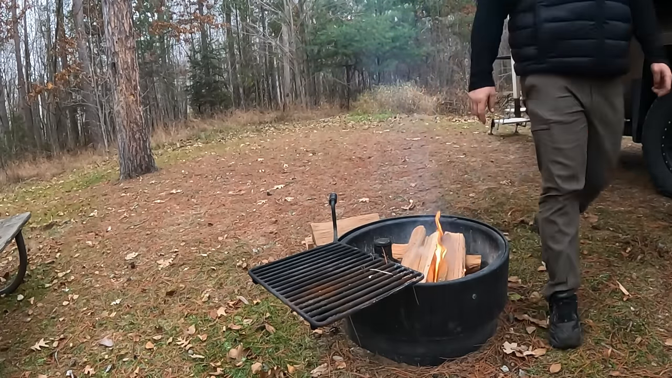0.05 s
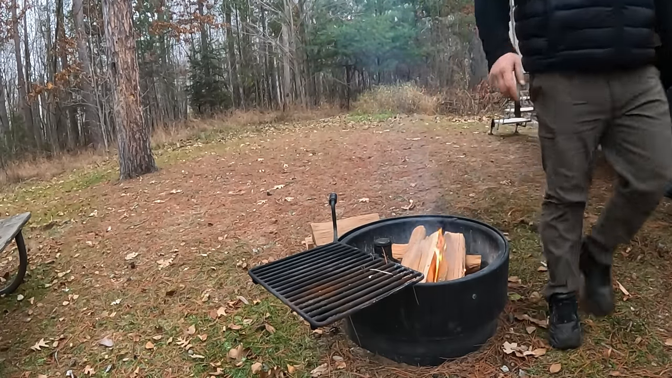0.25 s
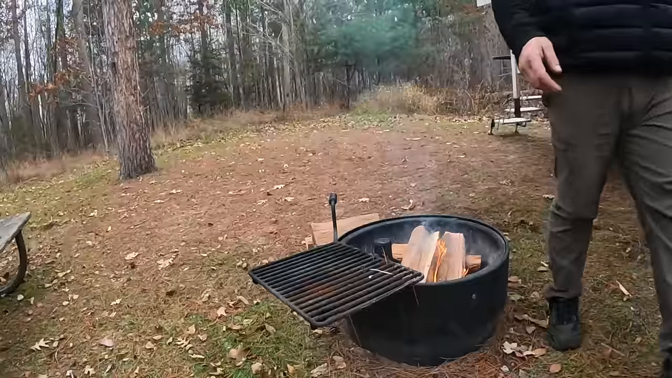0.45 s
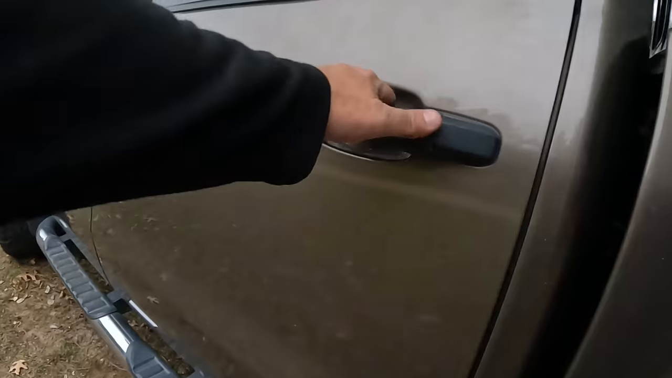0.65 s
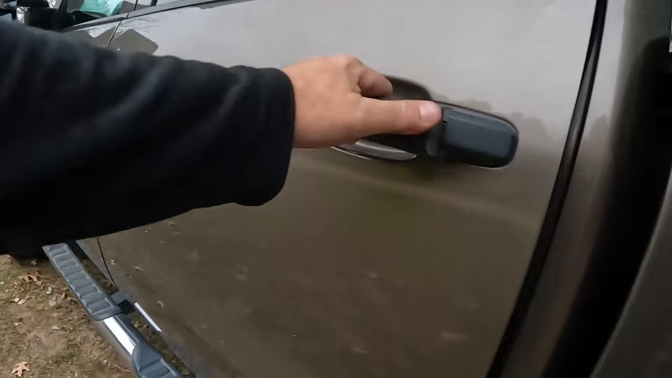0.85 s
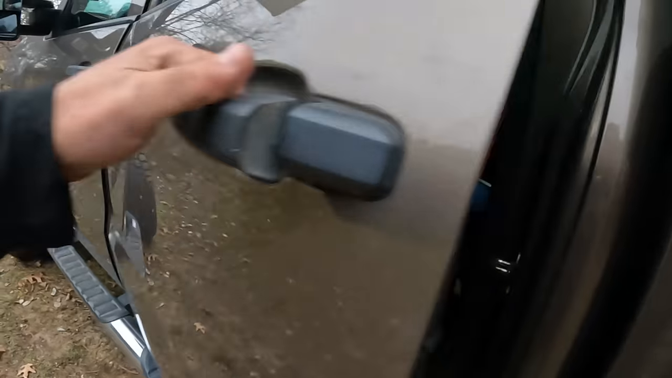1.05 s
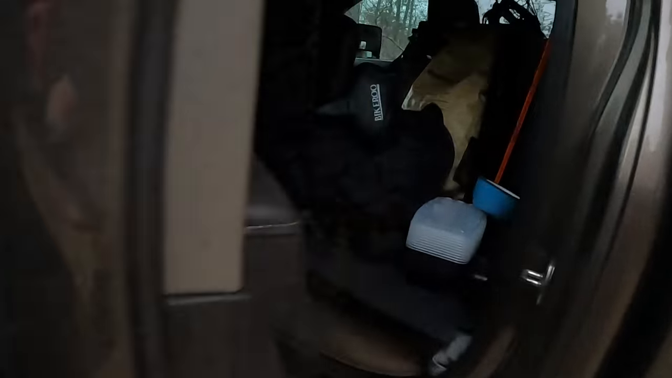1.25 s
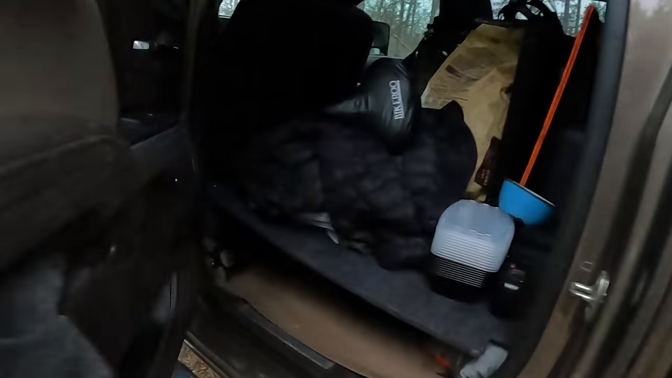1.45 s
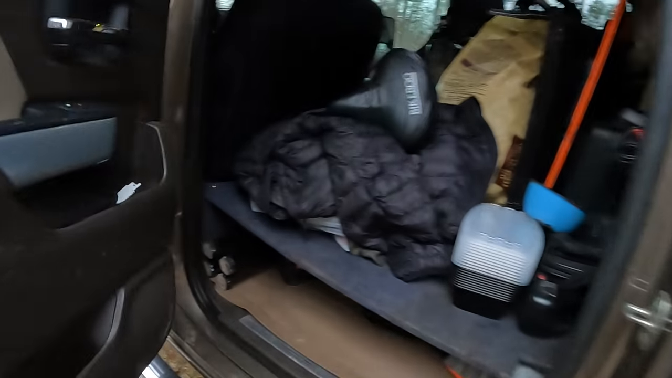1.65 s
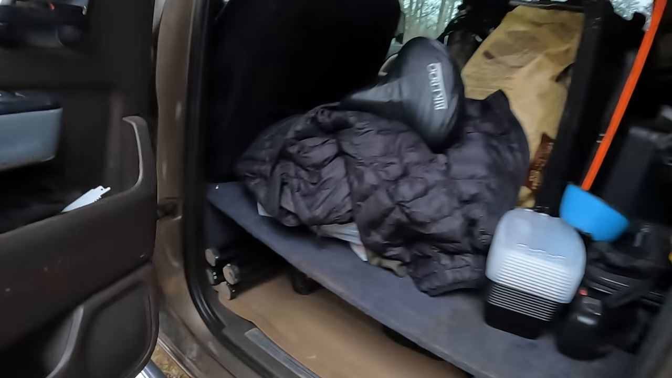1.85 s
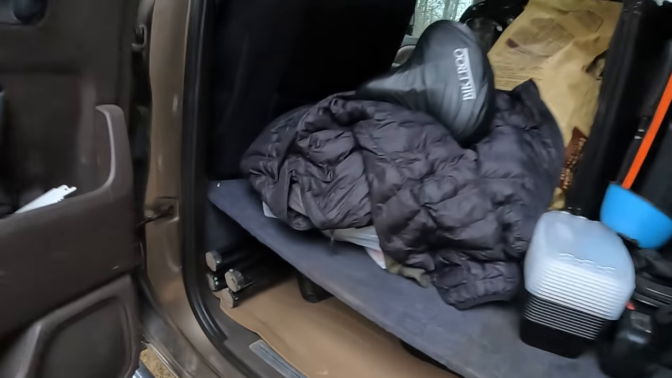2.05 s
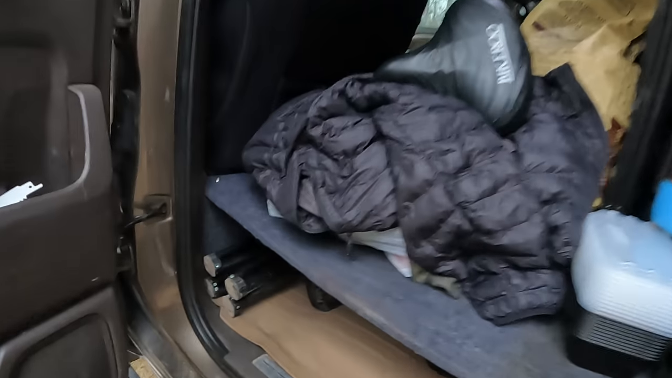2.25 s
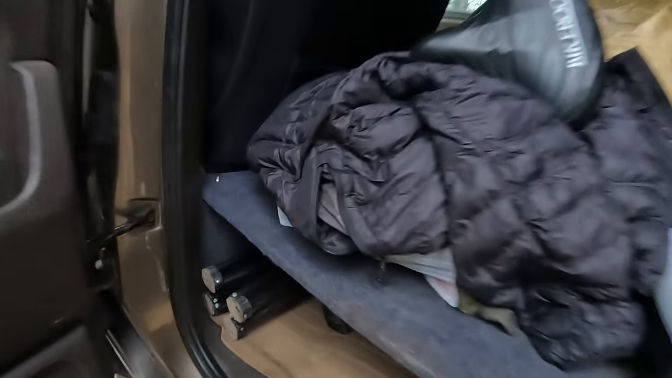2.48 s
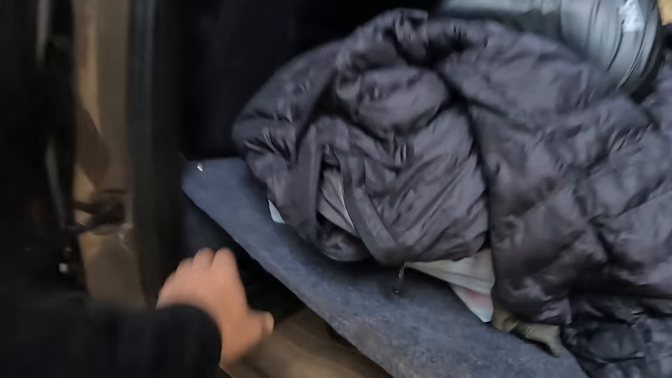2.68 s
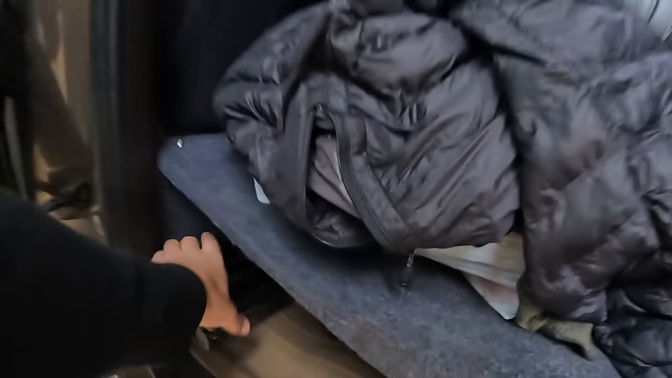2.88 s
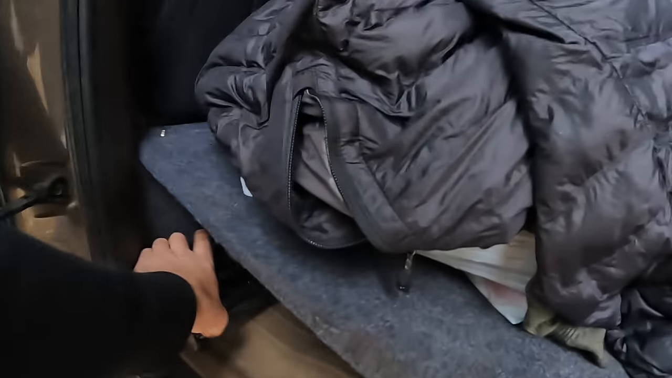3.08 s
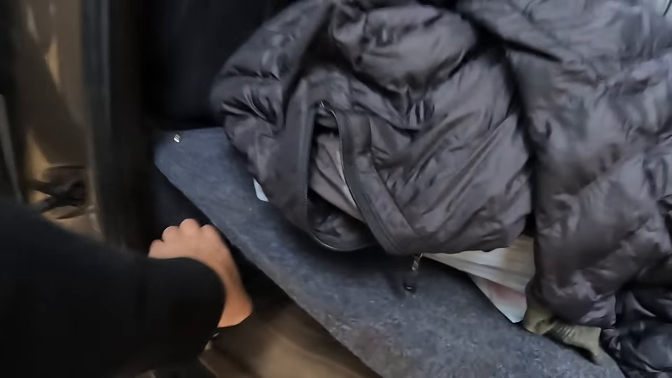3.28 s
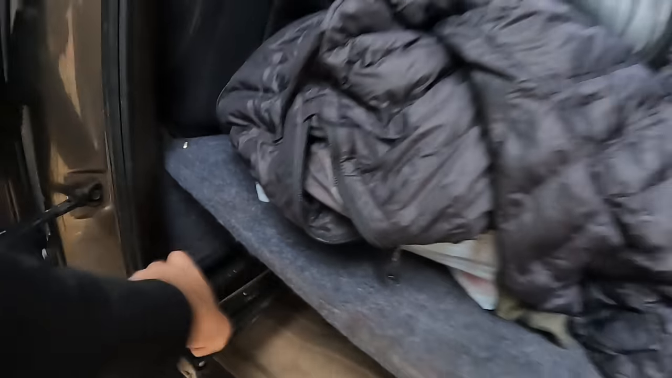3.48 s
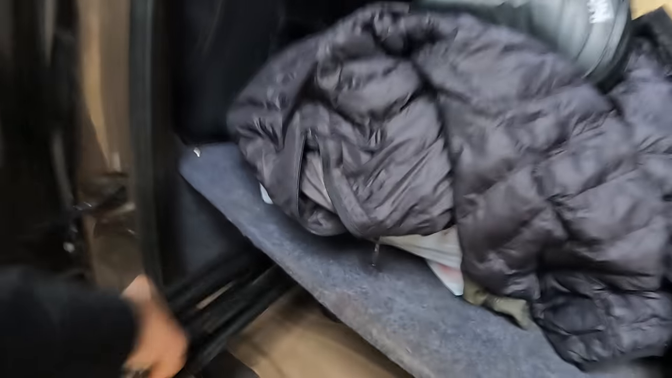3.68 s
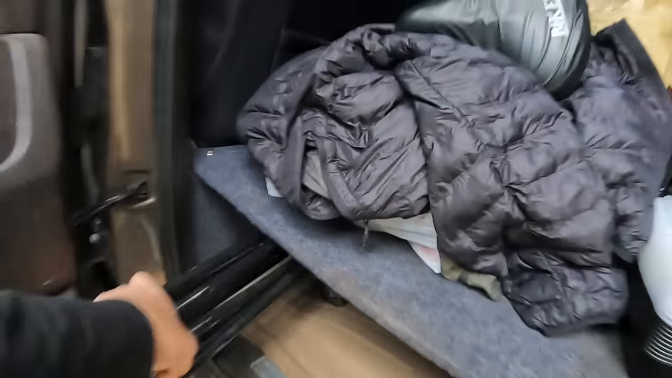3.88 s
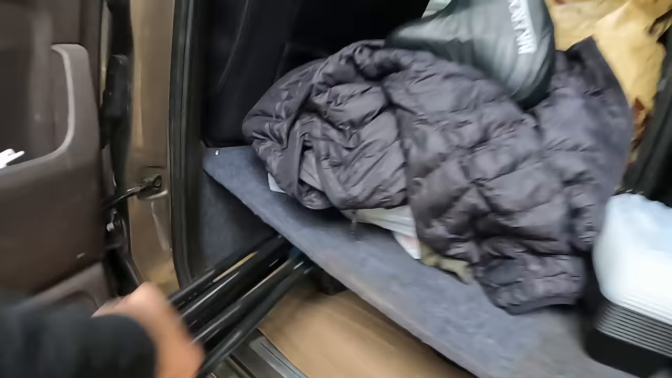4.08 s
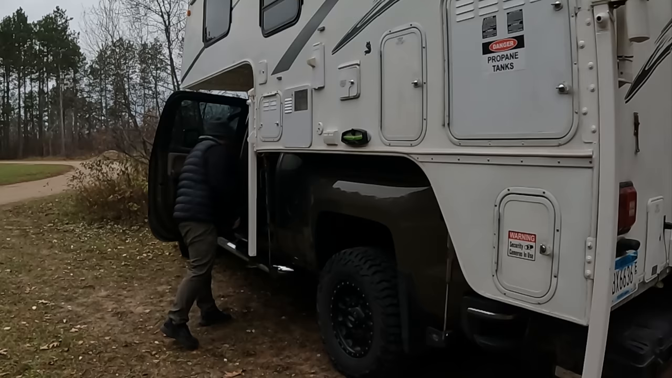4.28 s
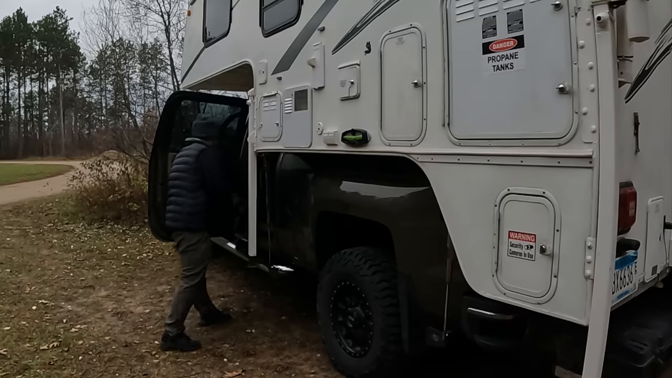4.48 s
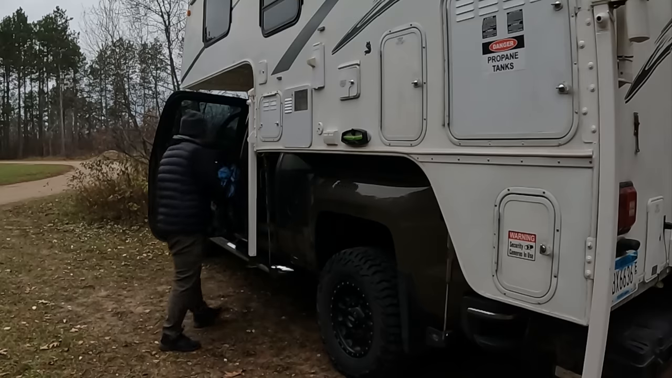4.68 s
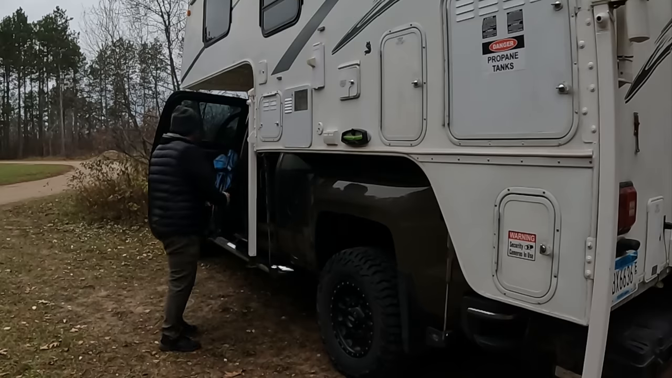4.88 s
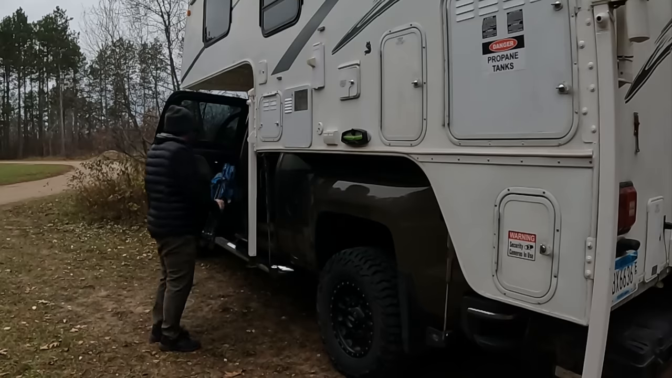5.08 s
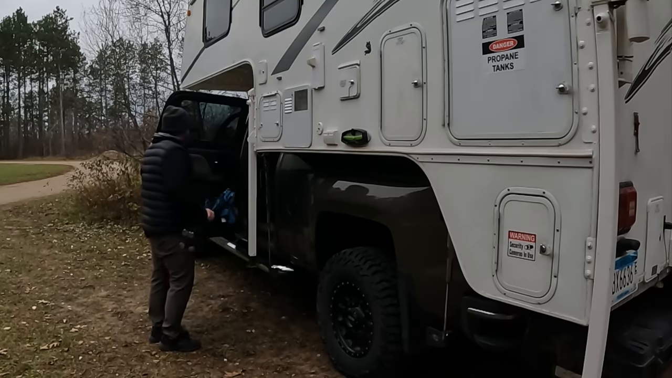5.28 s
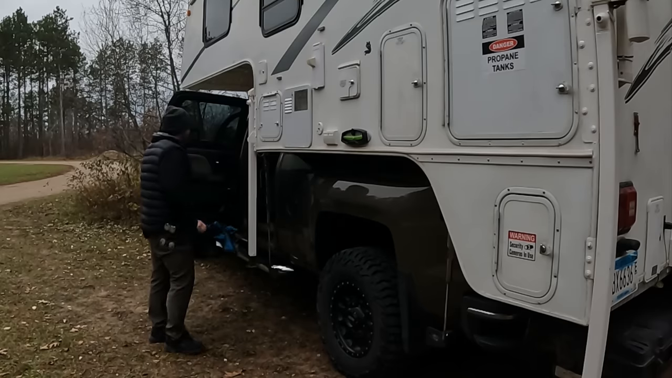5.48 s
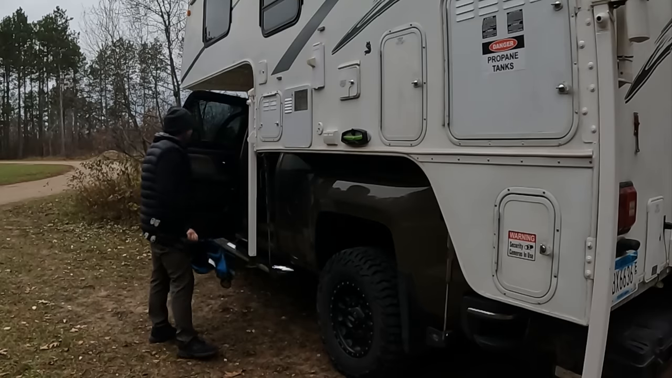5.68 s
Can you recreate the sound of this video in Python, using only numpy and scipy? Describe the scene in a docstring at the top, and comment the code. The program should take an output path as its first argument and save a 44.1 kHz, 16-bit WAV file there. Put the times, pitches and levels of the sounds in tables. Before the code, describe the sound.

In quiet woods, a body-worn microphone catches faint jacket rustle, then a loud dull door-latch clunk with quick rebounds. A sharper steel catch follows. Nylon swishes and small plastic ticks lead into tugs: low carpeted bumps, light metal tube clacks and rough fabric scraping, thinning to soft brushes and ticks.

```python
"""A pickup by quiet woods: its two side doors are unlatched and a folded camp chair is dragged out from under the seat.
Latch clunks, chair bumps and tube clacks are struck bodies: decaying sine modes plus band noise.
Floor rumble, cloth scrape and the wearer's nylon jacket are coloured noise under movement envelopes.
The camera is worn close to the jacket, which also ticks on its case; each microphone port hisses faintly."""
import sys
import numpy as np
from scipy import signal
from scipy.fft import rfft, irfft, next_fast_len
from scipy.io import wavfile
from scipy.ndimage import uniform_filter1d

SR = 44100
rng = np.random.default_rng(int(sys.argv[2]) if len(sys.argv) > 2 else 0)


def output_pcm(signal):
    """Save a mono or channel-first signal as 16-bit PCM at the path in sys.argv[1].

    Samples are clipped to [-1, 1] before scaling.
    """
    pcm = np.clip(np.atleast_2d(signal).T, -1, 1) * 32767
    wavfile.write(sys.argv[1], SR, np.round(pcm).astype(np.int16))


N = 253178
TIME = np.arange(N) / SR

# cloth scraping, of chair and jacket: hz, relative_db
SCRAPE_SPECTRUM = [(400, -18.5), (600, 4), (770, 7), (930, 2), (1130, 6.5), (1350, 5.5), (1560, 4),
                   (1850, -10), (2450, 1.5), (3500, -22.5), (6000, -23)]


def undb(db):
    """Decibels to gain."""
    return 10 ** (np.asarray(db) / 20)


def unit(x):
    """Scale to rms 1."""
    return x / np.sqrt(np.mean(x ** 2) + 1e-30)


def db_at(points, hz):
    """Read a spectrum on a log-frequency axis; it falls 20 dB per octave beyond its ends."""
    f, db = np.transpose(points)
    octave, known = np.log2(np.maximum(hz, 1)), np.log2(f)
    beyond = np.abs(octave - np.clip(octave, known[0], known[-1]))
    return np.interp(octave, known, db) - 20 * beyond


def colour(x, points):
    """Filter by a spectrum of (Hz, dB) points."""
    size = next_fast_len(len(x))
    hz = np.arange(size // 2 + 1) * SR / size
    return irfft(rfft(x, size) * undb(db_at(points, hz)), size)[:len(x)]


def coloured_noise(points):
    """Steady noise of rms 1 with the given spectrum."""
    return unit(colour(rng.standard_normal(N), points))


def walk(rate_hz):
    """Smooth random drift with an rms of 1."""
    k = max(int(SR / rate_hz), 1)
    steps = np.repeat(rng.standard_normal(N // k + 1), k)
    return unit(uniform_filter1d(steps, k)[:N])


def swells(events, attack, release):
    """Movements speed up, hold and slow down over shares of their length; one gain per dB column."""
    power = 0
    for start_s, length_s, *db in events:
        along = (TIME - start_s) / length_s
        ramp = np.clip(np.minimum(along / attack, (1 - along) / release), 0, 1)
        speed = np.sin(np.pi / 2 * ramp)
        power = power + (undb(db)[:, None] * speed) ** 2
    return np.sqrt(power)


def friction(points, grains_per_s, grain_db, spread_db, flutter_db, flutter_hz):
    """Countless tiny slips: a hiss with some larger grains, pressed unevenly, coloured by the surface."""
    present = rng.random(N) < grains_per_s / SR
    signs = rng.choice([-1, 1], N)
    sizes = undb(spread_db * np.minimum(rng.exponential(size=N), 4))
    grains = present * signs * sizes
    slips = rng.standard_normal(N) + undb(grain_db) * unit(grains)
    pressure = undb(flutter_db * walk(flutter_hz))
    return unit(colour(slips * pressure, points))


def blows(events, modes, rattle, rattle_db, rattle_t60_s, damping, rise_s, tail_db, tail_t60_s, shift):
    """Each blow rings a body's main modes and a dense rattle of lesser ones, with a weak longer tail."""
    t = np.arange(int(.6 * SR)) / SR  # every ring is cut at 0.6 s
    head = int(.015 * SR)  # a blow's level is the spread of these first samples
    hz, db, t60_s = np.transpose(modes)[:, :, None]
    pivot_octave = np.average(np.log2(hz), weights=undb(db))

    # rattle: noise in half-octave bands
    centres = 54 * 2 ** (np.arange(17) / 2)
    filters = [signal.butter(2, [f / 2 ** .25, f * 2 ** .25], "band", fs=SR, output="sos") for f in centres]
    noise = np.array([unit(signal.sosfilt(f, rng.standard_normal(2 * len(t)))) for f in filters])
    band_hz = centres[:, None]
    band_db = db_at(rattle, band_hz) + 10 * np.log10(band_hz)  # density to band level
    band_t60_s = rattle_t60_s * (band_hz / 2 ** pivot_octave) ** -damping  # treble dies first

    fade = -np.log(1000) * t
    contact = 1 - np.exp(-t / rise_s)
    sign = (-1) ** np.arange(len(hz))[:, None]
    out = np.zeros(N + len(t))
    for start_s, level_db, tilt_db, length, *main_hz in events:
        # every blow lands on a new spot, so the modes shift a little
        detune = 1 + shift * rng.standard_normal(hz.shape)
        spot_db = rng.standard_normal(hz.shape)
        start = rng.integers(len(t))
        if main_hz:  # a loose load is stiffer on some spots, which moves all its modes
            detune = detune * main_hz[0] / hz[np.argmax(db)]

        mode_gain = sign * undb(db + spot_db + tilt_db * np.log2(hz))
        ring = mode_gain * np.sin(2 * np.pi * hz * detune * t) * np.exp(fade / (t60_s * length))

        decay = np.exp(fade / (band_t60_s * length))
        tail = undb(tail_db) * np.exp(fade * rattle_t60_s / (band_t60_s * tail_t60_s))
        dense = noise[:, start:start + len(t)] * (decay + tail)
        dense = dense / dense[:, :2 * head].std(axis=1, keepdims=True)
        dense = dense * undb(band_db + tilt_db * np.log2(band_hz))

        ring, dense = ring.sum(0) * contact, dense.sum(0) * contact
        hit = ring / ring[:head].std() + undb(rattle_db) * dense / dense[:head].std()
        i = int(start_s * SR)
        out[i:i + len(t)] += hit / hit[:head].std() * undb(level_db)
    return out[:N]


def doors():
    """A dull clunk from the front latch, a sharp clack from the rear catch, and the slow sway of the panels."""
    # handle pulled, latch lets go: start_s, level_db, brightness_db_per_octave, ring_length_factor
    latch_blows = [(.755, -56.5, 30, 0.38), (.789, -42, 9.5, 2.4), (.8405, -17.5, -2, 0.6),
                   (.8465, -23, 3, .5), (.8485, -14, -0.5, 0.62), (.8495, -28, 6.5, 1.6),
                   (.8565, -30, 5, 0.74), (.8695, -48, -6, 0.33), (.9445, -41, 3.5, .8),
                   (.975, -48, 5, 1.2)]
    # front panel modes: hz, relative_db, t60_s (before ring_length_factor)
    front_modes = [(71.5, -15.5, 0.19), (128, -6, 0.092), (170.7, 0.5, 0.18), (284, -0.5, 0.171),
                   (422, -4.5, 0.078), (511, 3.5, 0.067), (734, -10.5, 0.039), (1068, -12, 0.074),
                   (1252, -11, 0.047), (1346, -16, 0.084), (1780, -21, 0.058), (2303, -26.5, 0.042),
                   (2750, -29.5, 0.042), (3170, -28, 0.037), (5050, -32.5, 0.013)]
    # front panel rattle: hz, relative_db
    front_rattle = [(24, -46), (40, -21.5), (290, 1.5), (359, -4), (425, 3), (566, -4.5), (718, -2),
                    (1130, -13), (1240, -17), (2000, -46), (2310, -30.5), (3640, -45.5), (12000, -86),
                    (15600, -103), (22000, -120)]
    # rear steel catch: start_s, level_db, brightness_db_per_octave, ring_length_factor
    catch_blows = [(1.482, -48, -14, 1), (1.496, -44, -1.5, 1.3), (1.559, -41, 0.5, 2.8),
                   (1.5815, -35.5, 7.5, 0.11), (1.5835, -20.5, 2.5, 0.56), (1.589, -28.5, 0, 0.62),
                   (1.595, -25, -3, 1.2), (1.630, -34.5, -20, 2.1), (1.672, -39, -8.5, 1.8)]
    # rear panel modes: hz, relative_db, t60_s (before ring_length_factor)
    rear_modes = [(196.6, -6, 0.13), (249, 1, 0.076), (314, -3, 0.07), (415, -4.5, 0.063), (557, 1, 0.034),
                  (744, 2, 0.075), (1116, -12, 0.13), (1300, -15, 0.093), (1740, -26, 0.1),
                  (2296, -11, 0.074), (3090, -3.5, 0.022), (4840, -20.5, 0.054), (5700, -26, 0.1),
                  (6460, -26, 0.089), (7200, -20, 0.042), (8760, -21, 0.04)]
    # rear panel rattle: hz, relative_db
    rear_rattle = [(59, -34), (100, -23), (201, 9), (589, 6), (742, 5), (1490, -12), (2320, -10),
                   (4280, -24), (5510, -30), (8950, -20.5), (12000, -56), (14200, -60), (15500, -87)]
    # door swings: start_s, length_s, level_db
    swings = [(.86, .2, -58), (1.44, 0.44, -54.5), (5.2, 0.46, -59.5)]
    # panel sway: hz, relative_db
    sway_spectrum = [(20, -7), (40, -42), (62, -10), (120, -13)]

    front_blows = latch_blows + chatter(count=4, tilt_db=-2.7, length=.9)
    front = blows(front_blows, front_modes, front_rattle, rattle_db=1.0, rattle_t60_s=0.034, damping=0.18,
                  rise_s=0.0027, tail_db=-34.0, tail_t60_s=0.32, shift=0.0047)
    rear = blows(catch_blows, rear_modes, rear_rattle, rattle_db=-1.7, rattle_t60_s=0.063, damping=0.11,
                 rise_s=0.001, tail_db=-22.5, tail_t60_s=0.2, shift=0.0062)
    sway, = swells(swings, attack=.15, release=0.65)
    return front + rear + sway * coloured_noise(sway_spectrum)


def chatter(count, tilt_db, length):
    """The freed door rebounds on its seal at even spacing, each rebound weaker than the last."""
    first_s, gap_s, first_db, loss_db = .879, .0165, -33.5, 1.5
    return [(first_s + k * gap_s, first_db - k * loss_db, tilt_db, length) for k in range(count)]


def chair():
    """The folded chair bumps, clacks and scrapes its way over the floor, tug by tug."""
    # bumps on carpet: start_s, level_db, brightness_db_per_octave, ring_length_factor, main_pitch_hz
    floor_bumps = [(2.121, -52, 7.5, 0.69, 194), (3.246, -38.5, 7.5, 0.6, 245),
                   (3.309, -31, 8.5, 0.36, 212), (3.321, -31.5, 8, 1.7, 160), (3.4065, -27, -4, 0.71, 393),
                   (3.4155, -24.5, 2.5, 0.52, 363), (3.455, -38, 8.5, 3.4, 406),
                   (3.472, -25.5, -3, 0.64, 355), (3.486, -30.5, 5.5, 2, 318), (3.511, -44, 12, 1.4, 311),
                   (3.600, -37, 9, 0.55, 340), (3.630, -34.5, 9, 0.88, 205), (3.674, -32, -3, 0.59, 268),
                   (3.8095, -19, 3.5, 1, 203), (3.822, -25.5, 7, 2, 195), (3.850, -23.5, 4.5, 0.54, 230),
                   (3.930, -28, 6.5, 0.54, 255), (3.938, -30.5, 3, 0.55, 344), (4.059, -37, -3, 0.62, 400),
                   (4.128, -33.5, 6, 0.95, 250), (4.147, -29, 5, 1.5, 200), (4.208, -34.5, 7, 2, 200),
                   (4.387, -30.5, -4, 2.1, 368), (4.399, -32, -12, 1.4, 240), (4.432, -33.5, 0, 0.59, 395)]
    # cab floor modes: hz (rescaled to main_pitch_hz), relative_db, t60_s (before ring_length_factor)
    floor_modes = [(176, -11.5, 0.056), (245.3, 5, 0.061), (304, -3, 0.037), (393, -6, 0.037),
                   (547, -12, 0.035), (724, -23, 0.051)]
    # cab floor rattle: hz, relative_db
    floor_rattle = [(29, -37), (50, -17), (220, 8), (349, 5), (501, -10.5), (762, -19), (1180, -17.5),
                    (1920, -57), (2340, -35.5), (4440, -48), (6000, -69), (7800, -77), (13200, -120)]
    # steel tubes meet: start_s, level_db, brightness_db_per_octave, ring_length_factor
    tube_clacks = [(3.1755, -50, 11, 0.77), (3.300, -39.5, -3.5, 0.4), (3.314, -42.5, 7.5, 0.71),
                   (3.421, -39.5, -4.5, 0.49), (3.600, -45, -9.5, 1.1), (3.667, -36, 3.5, 1.3),
                   (3.671, -30, -0.5, 0.47), (3.850, -38, 1.5, 0.7), (3.928, -40.5, -6.5, 0.67),
                   (3.931, -47.5, 14, 0.6), (4.059, -39.5, -3.5, 1.9), (4.269, -44.5, -1, 0.65),
                   (4.386, -36, -3.5, 1), (4.477, -43.5, 6, 1.3), (4.80, -48, 11, 1.9),
                   (4.895, -49.5, 11, 3.1), (5.004, -35.5, 1, 0.35), (5.013, -42, 2, 0.51)]
    # tube modes: hz, relative_db, t60_s (before ring_length_factor)
    tube_modes = [(1392, 14, 0.052), (1580, -2, 0.048), (2910, 7, 0.037), (3056, 3, 0.07),
                  (4250, 3.5, 0.054), (4560, 3.5, 0.055), (6400, 2, 0.066), (7300, 1, 0.062),
                  (8160, 0, 0.085), (8940, -8, 0.16), (9100, -6, 0.22), (9300, -1, 0.15)]
    # tube rattle: hz, relative_db
    tube_rattle = [(240, -36), (400, 0), (705, 2), (796, -2), (1630, 4), (2090, -1), (3300, 1.5),
                   (4840, -5.5), (5390, -16), (9070, -7.5), (15500, -33)]
    # tugs: start_s, length_s, floor_rumble_db, cloth_scrape_db
    tugs = [(3.23, 0.34, -42.5, -55.5), (3.35, 0.5, -40, -51), (3.6, 0.62, -43, -50.5),
            (4.05, 0.39, -41.5, -52), (4.38, 0.37, -38, -44.5), (4.69, 0.45, -47, -44)]
    # floor rumble: hz, relative_db
    rumble_spectrum = [(45, -65), (70, 0), (110, 1), (200, 6.5), (300, 1.5), (395, 6.5), (470, 6),
                       (570, -6), (700, -11.5)]

    bumps = blows(floor_bumps, floor_modes, floor_rattle, rattle_db=-7, rattle_t60_s=0.063, damping=0.19,
                  rise_s=0.004, tail_db=-33.0, tail_t60_s=0.15, shift=0.028)
    all_clacks = tube_clacks + jostle(count=14, tilt_db=-6.5, length=0.56)
    clacks = blows(all_clacks, tube_modes, tube_rattle, rattle_db=3.0, rattle_t60_s=0.054, damping=0.093,
                   rise_s=0.00091, tail_db=-20, tail_t60_s=0.28, shift=0.0067)
    rumble_gain, scrape_gain = swells(tugs, attack=.25, release=0.72)
    rumble = rumble_gain * friction(rumble_spectrum, grains_per_s=150, grain_db=-3, spread_db=2,
                                    flutter_db=1.5, flutter_hz=30)
    scrape = scrape_gain * friction(SCRAPE_SPECTRUM, grains_per_s=160, grain_db=0, spread_db=2.6,
                                    flutter_db=2.5, flutter_hz=55)
    zip_tone = squeak(start_s=4.45, length_s=.115, from_hz=5900, to_hz=7900, level_db=-46, wobble=.03)
    return bumps + clacks + rumble + scrape + zip_tone


def jostle(count, tilt_db, length):
    """Loose tubes clack lightly at uneven moments through the long slide."""
    start_s, length_s, level_db, scatter_db = 4.15, .85, -46, 3
    moment, force = rng.random((count, 2)).T
    times_s = start_s + length_s * (np.arange(count) + moment) / count
    levels_db = level_db + scatter_db * (2 * force - 1)
    return [(s, db, tilt_db, length) for s, db in zip(times_s, levels_db)]


def squeak(start_s, length_s, from_hz, to_hz, level_db, wobble):
    """A thin zip of taut cloth over an edge: a sine of rising, rapidly wobbling pitch."""
    along = np.clip((TIME - start_s) / length_s, 0, 1)
    hz = (from_hz + (to_hz - from_hz) * along) * (1 + wobble * walk(1500))
    envelope = np.sqrt(np.abs(np.sin(np.pi * along)))
    return undb(level_db) * envelope * np.sin(2 * np.pi * np.cumsum(hz) / SR)


def jacket():
    """Nylon swishes and rasps with every reach, the sleeves murmur, and the jacket ticks on the camera's case."""
    # arm movements: start_s, length_s, nylon_swish_db, sleeve_murmur_db
    reaches = [(0, 0.2, -60.5, -60.5), (.47, 0.15, -65, -62.5), (.61, .17, -58.5, -60),
               (.66, 0.56, -62, -52), (1.04, 0.55, -60.5, -55), (1.45, 0.47, -62, -48.5),
               (1.57, 0.33, -55, -69), (1.83, 0.31, -62.5, -57.5), (2.13, 0.29, -62, -59.5),
               (2.32, 0.72, -53, -55), (2.97, 0.4, -64, -53.5), (3.3, 1, -54, -50.5),
               (3.69, 0.25, -47.5, -58), (4.02, 0.99, -45.5, -51), (4.68, 0.52, -47.5, -51.5),
               (5.1, 0.25, -54, -56), (5.25, 0.62, -58, -59), (5.57, 0.076, -58, -78)]
    # nylon swish: hz, relative_db
    nylon_spectrum = [(1060, -37), (1800, 1.5), (2410, -3), (2670, -1.5), (3990, 0), (5700, -2),
                      (7160, -3.5), (9770, -5), (15100, -15.5), (16000, -15.5)]
    # dull murmur of moving sleeves: hz, relative_db
    sleeve_spectrum = [(50, -3.5), (130, -0.5), (270, -1.5), (410, -1), (520, -5), (700, -14), (1000, -14)]
    # knocks on the plastic case: start_s, level_db, brightness_db_per_octave, ring_length_factor
    case_ticks = [(.060, -55.5, 2, 0.49), (.372, -61, -2, 0.39), (.703, -48.5, 5, 0.15),
                  (.748, -50, -3.5, 2.7), (1.910, -41.5, -4.5, 1), (2.019, -54, 3, 0.53),
                  (2.2405, -50.5, 1, 0.18), (2.304, -50, 5, 5), (2.3285, -44, 8, 1.1),
                  (2.350, -45.5, 3.5, 2.6), (2.377, -48, 1, 0.89), (2.4315, -43, 3, 0.86),
                  (2.452, -41, 1.5, 0.96), (2.489, -45.5, 8, 0.89), (2.504, -33.5, 11, 1),
                  (2.507, -27, -8, 0.75), (4.9255, -37, 6, 0.65), (5.368, -44.5, 10, 0.43),
                  (5.605, -46, 6, 0.73), (5.719, -42, 8.5, 1.9)]
    # case modes: hz, relative_db, t60_s (before ring_length_factor)
    case_modes = [(404, -8.5, 0.048), (575, -1, 0.063), (830, -7, 0.11), (1313, 3, 0.022),
                  (1540, -8, 0.057), (1704, -5.5, 0.037)]
    # case rattle: hz, relative_db
    case_rattle = [(88, -50), (150, -30), (260, -20), (593, 5), (872, 16), (1130, 9), (1350, 13),
                   (2920, -19), (3210, -33), (4220, -19), (12000, -68.5), (15600, -73), (22000, -120)]
    stir_db, rasp_db = -68, -2.5  # faint constant stir; rasp of the weave relative to the swish

    slide, sleeves = swells(reaches, attack=0.25, release=0.57)
    slide = np.hypot(slide, undb(stir_db))
    swish = slide * friction(nylon_spectrum, grains_per_s=900, grain_db=-4, spread_db=3,
                             flutter_db=1, flutter_hz=55)
    rasp = slide * undb(rasp_db) * friction(SCRAPE_SPECTRUM, grains_per_s=300, grain_db=-5, spread_db=2.2,
                                            flutter_db=1.2, flutter_hz=30)
    murmur = sleeves * friction(sleeve_spectrum, grains_per_s=40, grain_db=-7, spread_db=1.5,
                                flutter_db=1.2, flutter_hz=18)
    ticks = blows(case_ticks, case_modes, case_rattle, rattle_db=-2.5, rattle_t60_s=0.087, damping=0.17,
                  rise_s=0.0001, tail_db=-22, tail_t60_s=0.1, shift=0.019)
    return swish + rasp + murmur + ticks


def brushes():
    """Single strokes of cloth on cloth, with a step or a tug, quick to start and slower to fade."""
    # strokes: start_s, length_s, level_db
    strokes = [(0, 0.062, -51.5), (0.054, 0.17, -60.5), (0.499, 0.084, -55.5), (0.617, 0.044, -64),
               (4.742, 0.049, -38), (5.17, 0.094, -49), (5.447, 0.12, -56.5)]
    # trouser cloth: hz, relative_db
    trouser_spectrum = [(700, -16), (1150, -37), (1400, 6.5), (1900, 2), (3200, 3.5), (5000, -1),
                        (8500, -5), (11000, -13.5), (15500, -30)]
    pressure, = swells(strokes, attack=0.083, release=.45)
    return pressure * friction(trouser_spectrum, grains_per_s=650, grain_db=-12, spread_db=1.5,
                               flutter_db=.6, flutter_hz=45)


def woods():
    """The quiet woods: steady coloured noise."""
    # woods: hz, relative_db
    woods_spectrum = [(25, -6), (60, 0), (200, 0), (400, -3), (600, -8), (1100, -11), (1500, -9),
                      (3500, -13), (8000, -19), (12000, -29), (16000, -36)]
    level_db = -64
    return undb(level_db) * coloured_noise(woods_spectrum)


def port_hiss():
    """Faint hiss and breeze at the microphone ports: steady coloured noise."""
    # ports: hz, relative_db
    hiss_spectrum = [(30, -4), (60, 3), (125, -9), (250, -17.5), (550, -11.5), (1200, -24), (2000, -23.5),
                     (4000, -14.5), (8000, -15.5), (15000, -19.5)]
    level_db = -75.5
    return undb(level_db) * coloured_noise(hiss_spectrum)


def scene():
    """Everything is close and central; a faint side signal follows the mid's level, weakest around 1 kHz."""
    # side level: hz, side_minus_mid_db
    side_level = [(30, -27), (150, -59), (500, -74), (1000, -83), (4000, -42), (8000, -40), (13000, -25)]
    background = woods()
    mid = doors() + chair() + jacket() + brushes() + background
    follower = colour(mid * walk(400), side_level)  # mid's level with random sign and size
    side = follower + port_hiss()
    return np.array([mid + side, mid - side])


def record(dry):
    """The camera cuts the top: a steep elliptic low-pass."""
    top_hz = 15850
    return signal.sosfilt(signal.ellip(10, .2, 80, top_hz, fs=SR, output="sos"), dry)


dry = scene()
out = record(dry)
output_pcm(out)
```